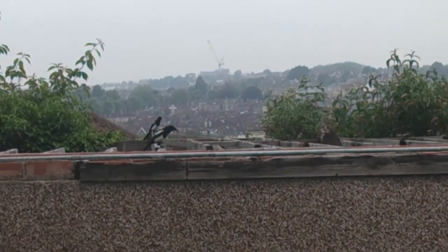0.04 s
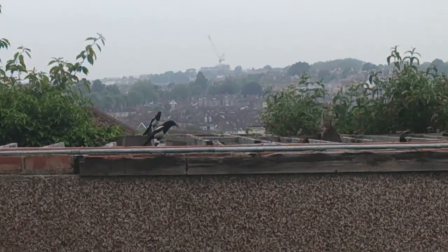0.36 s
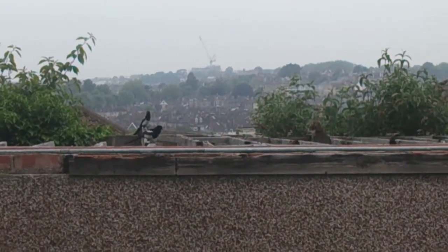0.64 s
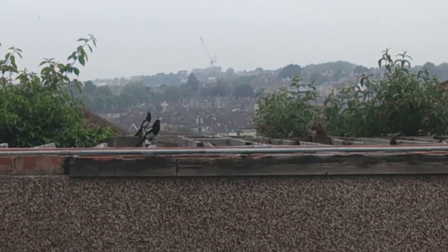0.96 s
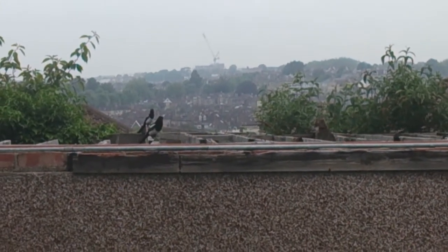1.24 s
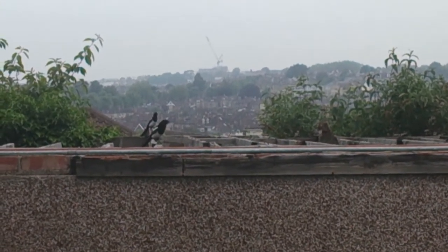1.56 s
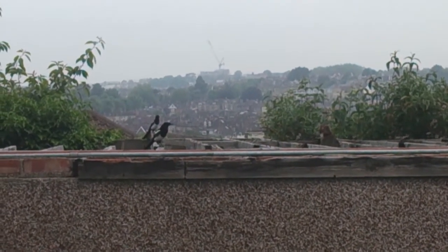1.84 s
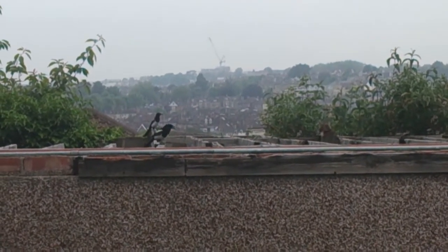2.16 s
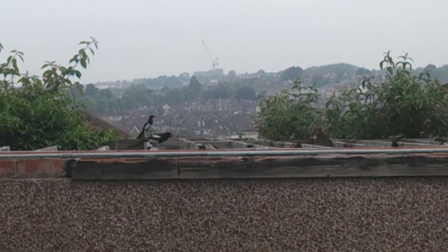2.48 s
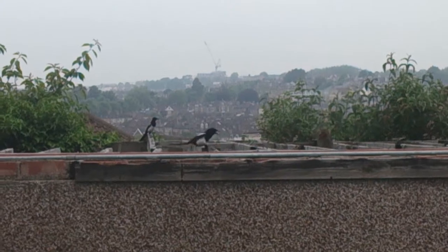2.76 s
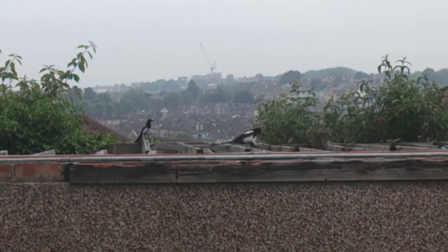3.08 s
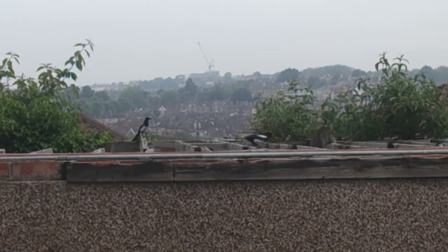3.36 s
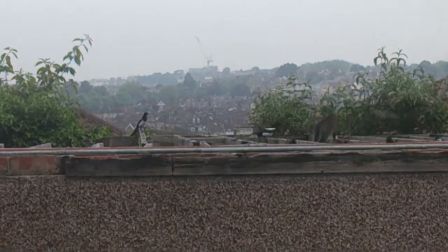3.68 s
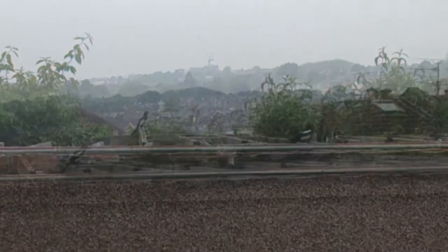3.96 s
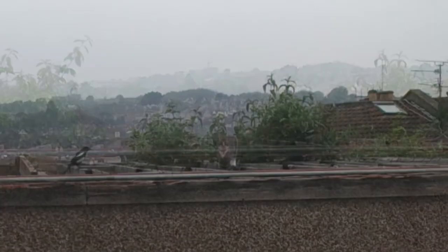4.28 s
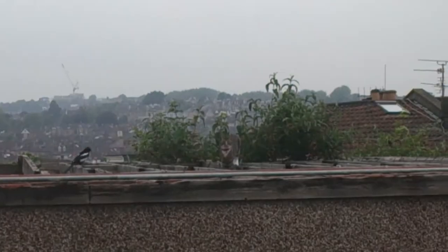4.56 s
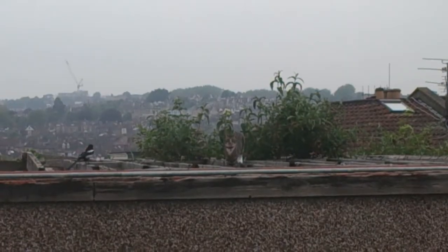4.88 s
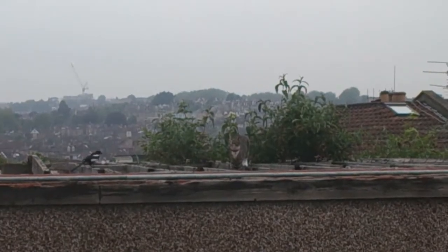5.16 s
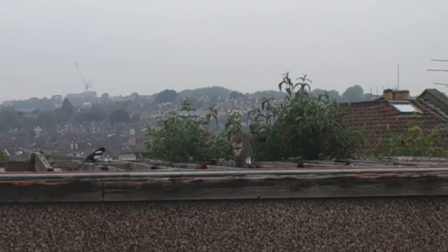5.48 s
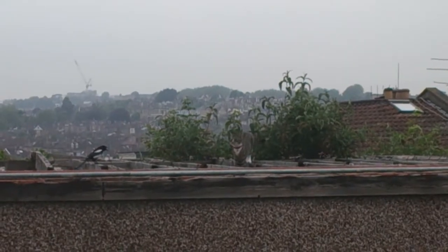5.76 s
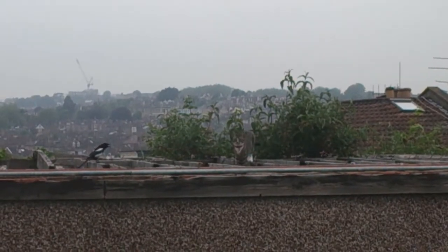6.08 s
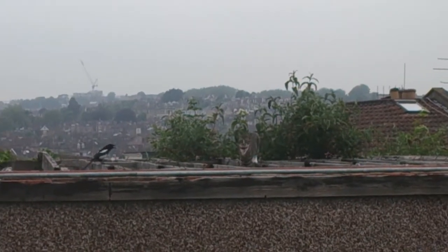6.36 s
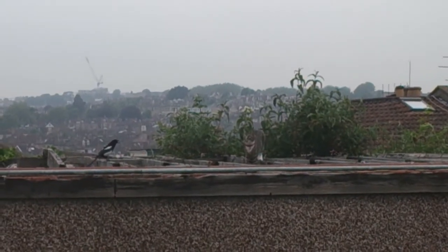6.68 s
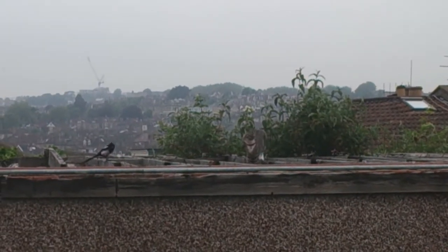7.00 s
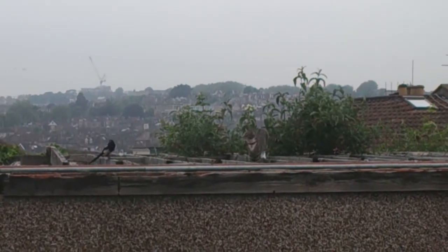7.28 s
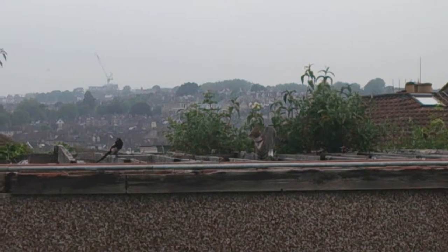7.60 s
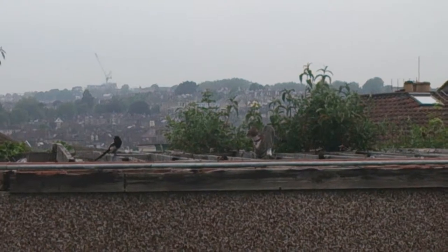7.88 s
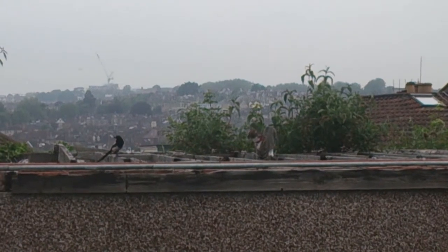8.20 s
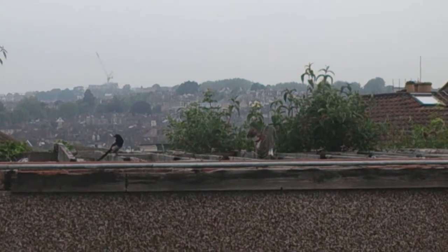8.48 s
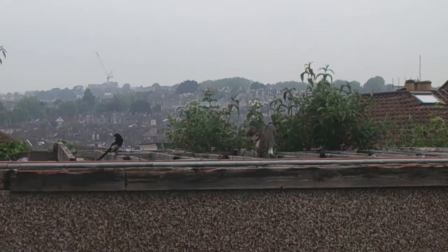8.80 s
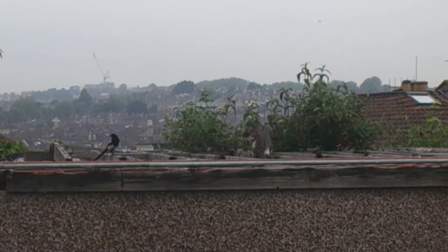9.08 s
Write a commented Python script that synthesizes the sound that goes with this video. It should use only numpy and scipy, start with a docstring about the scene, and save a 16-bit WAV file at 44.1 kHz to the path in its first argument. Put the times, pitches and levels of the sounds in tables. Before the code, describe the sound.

Magpies chatter in harsh, rapid rattling bursts outdoors, over the faint rumble of a town and a distant engine.

```python
"""Magpies scolding a cat

Four bouts of harsh chatter from a flat roof, about nine notes a second: uneven puffs from the syrinx
ring the throat, the open bill adds rasp, and walls and gardens answer. Behind them a town rumbles and
a distant engine drones. Two sharp clicks sound close on the right, a thin electronic whine on the left."""
import sys
import numpy as np
from scipy import signal
from scipy.fft import rfft, irfft, next_fast_len
from scipy.io import wavfile
from scipy.ndimage import uniform_filter1d, map_coordinates

SR = 44100
rng = np.random.default_rng(int(sys.argv[2]) if len(sys.argv) > 2 else 0)


def digitize_waveform(pressure):
    """Quantize a signal to 16-bit integers and store it at the path in sys.argv[1].

    Rows of a 2-D input are taken as channels; values are limited to [-1, 1].
    """
    field = np.atleast_2d(pressure).T
    bounded = np.clip(field, -1, 1)
    quanta = np.round(bounded * 32767).astype(np.int16)
    wavfile.write(sys.argv[1], SR, quanta)


N = 403074


def amp(db):
    """dB to gain."""
    return 10 ** (np.asarray(db) / 20)


def unit(x):
    """Scale to rms 1."""
    return x / np.sqrt(np.mean(x ** 2) + 1e-20)


def along(points, hz):
    """Interpolate (Hz, value) points on a log frequency axis."""
    knots_hz, values = np.transpose(points)
    return np.interp(np.log(hz + 1), np.log(knots_hz), values)


def curves(rows, t=None):
    """Each column after the time, interpolated at times t or at every sample."""
    knots_s, *columns = np.transpose(rows)
    return [np.interp(np.arange(N) / SR if t is None else t, knots_s, column) for column in columns]


def wobble(rate_hz):
    """Smooth random curve, rate_hz knots a second."""
    knots = rng.standard_normal(int(N * rate_hz / SR) + 4)
    return map_coordinates(knots, [np.arange(N) * rate_hz / SR])


def filtered(x, response):
    """Apply a complex frequency response."""
    n = x.shape[-1]
    size = next_fast_len(n + 4096)
    return irfft(rfft(x, size) * response(np.fft.rfftfreq(size, 1 / SR)), size)[..., :n]


def causal(x, gain_db, size=1024):
    """Minimum-phase filter with the response gain_db(hz)."""
    cepstrum = irfft(np.log(amp(gain_db(np.fft.rfftfreq(size, 1 / SR)))))
    cepstrum[1:size // 2] *= 2
    cepstrum[size // 2 + 1:] = 0
    return signal.fftconvolve(x, irfft(np.exp(rfft(cepstrum))))[:len(x)]


def add(track, start_s, sound):
    """Mix a sound into the track."""
    i = round(start_s * SR)
    part = sound[..., max(-i, 0):N - i]
    track[..., max(i, 0):max(i, 0) + part.shape[-1]] += part


def rush(spectrum, correlation, pan_db, patchy_db):
    """Stereo noise, rms near 1, with random gain patches in time and frequency."""
    bins = signal.stft(rng.standard_normal((2, N)), nperseg=512)[2]
    patches = uniform_filter1d(rng.standard_normal(bins.shape[1:]), size=5, axis=0)
    patches = unit(uniform_filter1d(patches, size=20, axis=1))
    pair = signal.istft(bins * amp(patchy_db * patches), nperseg=512)[1][:, :N]
    mid, side = filtered(pair, lambda hz: amp(along(spectrum, hz)))
    side = side * np.tan(np.arccos(correlation) / 2)
    return unit(np.array([mid + side, mid - side])) * amp([[pan_db / 2], [-pan_db / 2]])


def town(surge_db=2.4, drift_db=0.4):
    """Deep rumble, traffic and the wash of far streets, over a faint hiss."""
    # Each row: time in seconds, then rumble, traffic, wash and hiss levels in dB.
    levels = [(0, -58, -63, -64.5, -67), (2.1, -54.5, -63.5, -67, -69.5), (2.6, -59.5, -64.5, -62.5, -66.5),
              (3.5, -54.5, -63.5, -66.5, -67.5), (3.9, -53.5, -57.5, -63, -65),
              (4.45, -52, -60, -63, -64.5), (4.7, -57.5, -62, -64.5, -67.5), (5.7, -56.5, -63.5, -65, -69),
              (6.5, -51.5, -63, -58, -67.5), (7, -57.5, -62.5, -64, -66.5), (7.7, -54.5, -60, -60, -67.5),
              (8.15, -55, -61, -63, -68.5), (9.14, -48.5, -60, -61.5, -68)]
    # Noise spectra. Each row: frequency in Hz, relative density in dB.
    rumble_spectrum = [(12, 1.5), (28, 7.5), (42, 12.5), (55, -3), (80, -1), (130, -45)]
    traffic_spectrum = [(50, -3), (90, 2), (140, -1), (240, -2.5), (400, -10), (700, -13.5), (1500, -52)]
    wash_spectrum = [(200, -0.5), (450, -6), (650, 1.5), (1000, -2.5), (1600, -8.5), (2500, -7.5),
                     (3500, -18.5), (5500, -29), (7500, -42), (12000, -34)]
    hiss_spectrum = [(3000, -5), (5500, -9.5), (7600, -16), (9000, -4.5), (10000, -3.5), (11500, -3),
                     (13000, -12.5), (15000, -10), (15900, -14)]
    rumble_db, traffic_db, wash_db, hiss_db = curves(levels)
    rumble = rush(rumble_spectrum, correlation=0.96, pan_db=4.8, patchy_db=0.3)
    rumble_db += surge_db * wobble(4.4)
    traffic_db += drift_db * wobble(2.96)
    traffic = rush(traffic_spectrum, correlation=0.88, pan_db=3.5, patchy_db=1.5)
    wash = rush(wash_spectrum, correlation=0.46, pan_db=0.8, patchy_db=0.33)
    hiss = rush(hiss_spectrum, correlation=0.036, pan_db=0, patchy_db=1.5)
    return (amp(rumble_db) * rumble + amp(traffic_db) * traffic
            + amp(wash_db) * wash + amp(hiss_db) * hiss)


def engine():
    """A distant exhaust revs and eases off; little but its firing note carries."""
    # Each row: time in seconds, firing rate in Hz, level in dB.
    revs = [(0, 68.2, -70), (1.15, 68, -60), (1.7, 68, -73), (2.1, 68.5, -61.5), (2.7, 68, -71.5),
            (3.7, 69, -59.5), (4.25, 62.4, -61), (4.85, 69.5, -52.5), (5.02, 68.9, -61),
            (5.27, 66.9, -53.5), (5.55, 68, -66), (5.76, 67.7, -52), (6.2, 62, -55.5), (6.55, 66, -56.5),
            (7.1, 60, -60), (8.15, 59.7, -66.5), (8.33, 59.7, -55), (8.8, 64, -48.5), (9.14, 69, -42.5)]
    firing_hz, level_db = curves(revs)
    phase = 2 * np.pi * np.cumsum(firing_hz * (1 + 0.015 * wobble(14))) / SR
    drone = np.sin(phase) + amp(-36) * np.sin(2 * phase) + amp(-29.5) * np.sin(3 * phase)
    return amp(level_db + 2.0 * wobble(6)) * unit(drone) * amp([[1.6], [-1.6]])


def whine(whine_hz=15000, steady_hz=9717, steady_db=-86):
    """An electronic whistle on the left comes on, swells and fades, over a faint steady tone."""
    # Each row: time in seconds, left level in dB.
    levels = [(2.28, -92), (2.33, -66.5), (3.3, -66.5), (4.2, -62.5), (4.7, -66.5), (8.55, -66.5),
              (8.62, -92)]
    tone = lambda hz: np.sqrt(2) * np.sin(2 * np.pi * hz * np.arange(N) / SR)
    whistle = amp(curves(levels)[0]) * tone(whine_hz) * amp([[0], [-15]])
    return whistle + amp(steady_db) * tone(steady_hz)


def clicks(left_db=-19, highpass_hz=450, knock_t60_s=0.0028, rebound_s=0.00191):
    """Hard, dry clicks: a dull knock, a bright snap and one faint rebound."""
    # Each row: start in seconds, knock level in dB, knock frequency in Hz, snap level in dB.
    hits = [(4.1562, -9.5, 1890, -22), (4.465, -7.5, 2180, -0.5)]
    # Each row: frequency in Hz, relative level in dB, T60 in seconds.
    snap_modes = [(3880, -3, 0.0023), (4940, -17.5, .004), (6000, -13, 0.0051), (10600, -12, 0.0027),
                  (11700, 2.5, 0.0017), (13800, -11, 0.0025)]
    out, t = np.zeros(N), np.arange(SR // 40) / SR
    mode = lambda hz, db, t60_s: amp(db - 60 * t / t60_s) * np.sin(2 * np.pi * hz * t)
    attack = 1 - np.exp(-t / 0.00008)
    for start_s, knock_db, knock_hz, snap_db in hits:
        knock = mode(knock_hz, knock_db, knock_t60_s)
        snap = sum(mode(hz, snap_db + db, t60_s) for hz, db, t60_s in snap_modes)
        add(out, start_s, (knock + snap) * attack)
        add(out, start_s + rebound_s, amp(-12) * knock)
    return signal.lfilter(*signal.butter(1, highpass_hz, "high", fs=SR), out) * amp([[left_db], [0]])


def echo(x, t60s, delay_s):
    """Diffuse stereo tail; each frequency decays at its own rate."""
    hz, t, bins = signal.stft(rng.standard_normal((2, SR // 2)), SR, nperseg=256)
    tail = signal.istft(bins * amp(-60 * t / along(t60s, hz)[:, None]), SR, nperseg=256)[1]
    tail = np.pad(tail / np.linalg.norm(tail[0]), ((0, 0), (int(delay_s * SR), 0)))
    return signal.fftconvolve(x[None], tail, axes=1)


def over_roof(call, lead_ms, scatter_s=0.0022, lead_above_hz=1200):
    """The rough roof scatters short waves; unscattered treble arrives left first. Power is kept."""
    # Each row: frequency in Hz, share of power scattered.
    scattered = [(1000, 0.088), (2600, 0.14), (3600, 0.99), (6000, 0.96), (9000, 1), (14000, 0.24)]
    t = np.arange(SR // 100) / SR
    paths = rng.standard_normal((2, len(t))) * np.exp(-t / scatter_s)

    def response(hz):
        share = along(scattered, hz)
        lead_rad = np.pi * np.maximum(hz - lead_above_hz, 0) * lead_ms / 1000 * np.array([[1], [-1]])
        scatter_rad = np.angle(rfft(paths, 2 * len(hz) - 2))
        return np.sqrt(1 - share) * np.exp(1j * lead_rad) + np.sqrt(share) * np.exp(1j * scatter_rad)

    pair = filtered(call, response)
    return pair * np.std(call) / np.std(pair, axis=1, keepdims=True)


def syrinx(t, rate_hz, jitter=0.13, puff_s=0.0018, count=32):
    """Airflow through the membranes: uneven, quickening slaps and their rounded puffs."""
    gaps_s = np.exp(jitter * rng.standard_normal(count)) / rate_hz / (1 + 0.05 * np.arange(count))
    times_s = np.cumsum(gaps_s) - 0.8 / rate_hz
    slaps = np.bincount(np.abs(times_s * SR).astype(int), np.ones(count), len(t))[:len(t)]
    puffs = signal.fftconvolve(slaps, t * np.exp(-t / puff_s))[:len(t)]
    return unit(slaps), unit(puffs)


def swell(t, start_s, length_s, fall_s, rise_s=0.016, crescendo_db=4):
    """Note envelope: rounded rise, growing pressure, quick decay."""
    onset = np.sin(np.pi / 2 * np.clip((t - start_s) / rise_s, 0, 1)) ** 2
    pressure = amp(crescendo_db * np.clip((t - start_s) / length_s, 0, 1))
    return onset * pressure * np.exp(-np.maximum(t - start_s - length_s, 0) / fall_s)


def note(length_s, level_db, throat_hz, hiss_db, rasp_db=-9.5, ring_db=3.5, ring_width_hz=150):
    """One 'chak': the throat sounds first, the treble follows as the bill opens."""
    # Voice bands, low to high. Each row: frequency in Hz, relative gain in dB.
    body_band = [(300, -26.5), (700, -19.5), (1100, -7.5), (1400, 0.5), (1650, 2), (1900, 9.5),
                 (2200, -14.5), (3000, -38.5)]
    throat_band = [(1200, -30.5), (1800, -13), (2000, -2), (2180, -2.5), (2400, 3.5), (2750, -1),
                   (3050, -8.5), (3500, -21), (4500, -42.5)]
    rasp_band = [(2500, -28), (3300, -6), (3900, -5), (4500, -3), (4950, 3), (5600, -3.5), (6200, -5.5),
                 (7300, -13), (9000, -32)]
    hiss_band = [(6000, -26), (8200, -5.5), (9500, -1.5), (11500, 1.5), (12900, -3), (13800, -3),
                 (15000, -10), (16000, -32)]
    t = np.arange(SR // 8) / SR
    slaps, puffs = syrinx(t, rate_hz=152.1 * throat_hz / 2498)  # a tighter throat pulses faster
    pulses = 0.33 * slaps + puffs * rng.standard_normal(len(t))
    air = 0.5 * pulses + 0.94 * rng.standard_normal(len(t))
    effort = swell(t, 0, length_s - 0.001, fall_s=0.0094)
    bill_air = air * swell(t, 0.0068, length_s - 0.008, fall_s=0.023)
    # Each puff carries a few cycles of the membranes' unsteady whistle.
    waver = unit(uniform_filter1d(rng.standard_normal(len(t)), size=90))
    phase = 2 * np.pi * np.cumsum(throat_hz * (1 + 0.061 * waver)) / SR
    whistle = unit(puffs * effort * np.sin(phase))
    # Soft notes are hoarser: less whistle, more body.
    whistle_db = -5 + 0.1 * (level_db + 40)
    body_db = -8 - 0.16 * (level_db + 43)
    resonance = lambda hz: ring_db / (1 + ((hz - throat_hz) / ring_width_hz) ** 2)
    warp = (2500 / throat_hz) ** 0.17
    bands = [(pulses * effort, lambda hz: along(throat_band, hz * warp) + resonance(hz), -1.8),
             (pulses * effort, lambda hz: along(body_band, hz), body_db),
             (bill_air, lambda hz: along(rasp_band, hz), rasp_db),
             (bill_air, lambda hz: along(hiss_band, hz), hiss_db)]
    voice = amp(whistle_db) * whistle + sum(amp(db) * unit(causal(x, shape)) for x, shape, db in bands)
    return amp(level_db) * voice * np.sqrt(length_s / t[-1])


def magpies(garden_db=-16.5, wall_turn=0.33, bout_gap_s=0.3, hush_s=(4.58, 5.55)):
    """Notes arrive over the roof and off walls and gardens; a turned head dulls only the direct path."""
    # Each row: time in seconds, level in dB.
    notes = [(-.025, -45.5), (.079, -46.5), (.182, -46.5), (.29, -47.5), (.399, -47), (.878, -48),
             (.95, -40), (1.027, -40), (1.11, -40), (1.19, -40), (1.278, -39), (1.377, -38.5),
             (1.499, -39.5), (2.347, -45.5), (2.417, -42), (2.494, -42), (2.582, -40.5), (2.669, -38.5),
             (2.772, -41), (2.88, -41), (2.989, -43), (3.092, -42), (3.215, -42.5), (3.324, -44),
             (3.433, -44), (3.534, -44.5), (3.64, -44), (3.745, -42.5), (3.844, -41.5), (3.957, -42),
             (4.069, -42.5), (4.174, -41.5), (4.29, -43), (4.398, -42), (4.503, -43), (5.6, -55.5),
             (5.67, -49), (5.744, -46.5), (5.827, -47.5), (5.911, -47), (6.002, -46), (6.106, -44.5),
             (6.212, -42), (6.322, -42), (6.431, -42), (6.565, -44), (6.699, -42.5), (6.805, -42),
             (6.913, -40.5), (7.016, -42), (7.119, -41), (7.221, -43), (7.328, -41), (7.433, -43),
             (7.542, -42.5), (7.655, -42.5), (7.792, -43.5)]
    # Each row: time in seconds, throat resonance in Hz, head turned away from 0 to 1.
    caller = [(0, 2760, 0.04), (.4, 2686, 0.16), (.9, 2478, 0.23), (1.5, 2478, 0.21), (2.38, 2527, 0.67),
              (2.64, 2595, 0.24), (2.9, 2527, 0.85), (3.8, 2543, 1), (4.45, 2428, 1), (5.6, 3033, 0.3),
              (6.03, 2933, 0.36), (6.28, 2683, .3), (6.5, 2430, 0.66), (6.72, 2573, 0.29),
              (7.05, 2477, 0.01), (7.8, 2550, 0.01)]
    # Each row: time in seconds, left lead in ms, wall echo in dB, hiss in dB re note level.
    place = [(0, 0.071, -6, -8.5), (1.5, 0.076, -9.5, -12.5), (2.6, 0.043, -9, -11.5),
             (4.4, 0.023, -2, -16), (5.7, 0.28, -2.5, -18), (6.4, .26, -7, -14), (7.8, 0.19, -5, -14)]
    # The bill beams treble forward. Each row: frequency in Hz, gain in dB when fully turned away.
    beam = [(2800, -0.5), (5000, -17), (10000, -19.5)]
    # Echo decay. Each row: frequency in Hz, T60 in seconds.
    wall_t60s = [(500, 0.63), (2500, 0.23), (5000, 0.48), (12000, 0.045)]
    garden_t60s = [(500, 0.84), (1700, 0.94), (2250, 0.88), (2580, 1), (2900, 0.88), (3500, 0.5),
                   (4400, .5), (5050, 0.85), (5800, 0.65), (9000, 0.097)]
    # Each row: frequency in Hz, left minus right in dB.
    pan = [(700, 1.5), (1300, -4), (2400, 0), (3200, 7), (4500, 5.5), (6300, 6), (8100, -3), (11000, -4.5),
           (15000, 5)]
    first_length_s, late_length_s = 0.035, 0.05  # notes lengthen through a bout
    out, sung, previous_s = np.zeros((2, N)), 0, -np.inf
    for time_s, level_db in notes:
        sung = sung + 1 if time_s - previous_s < bout_gap_s else 0
        previous_s = time_s
        length_s = late_length_s + (first_length_s - late_length_s) * np.exp(-sung / 7)
        throat_hz, turn = curves(caller, time_s)
        lead_ms, wall_db, hiss_db = curves(place, time_s)
        call = note(length_s, level_db, throat_hz, hiss_db)
        call /= np.hypot(1, 0.87 * amp(wall_db))  # offsets the power the walls add
        direct = causal(call, lambda hz: turn * along(beam, hz))
        sideways = causal(call, lambda hz: wall_turn * along(beam, hz))
        start_s = time_s - 0.0096
        add(out, start_s, over_roof(direct, lead_ms))
        add(out, start_s, amp(wall_db) * echo(sideways, wall_t60s, delay_s=0.004))
        add(out, start_s, amp(garden_db) * echo(sideways, garden_t60s, delay_s=0.035))
    # Chatter and echo drop out abruptly between the hush_s times.
    t = np.arange(N) / SR
    gate = uniform_filter1d(1.0 * ((t < hush_s[0]) | (t > hush_s[1])), size=128)
    return gate * filtered(out, lambda hz: amp(along(pan, hz) * np.array([[0.5], [-0.5]])))


def scene():
    """Birds and clicks in front of the town."""
    return town() + engine() + whine() + clicks() + magpies()


def record(dry, cutoff_hz=16200):
    """Steep low-pass band limit."""
    return filtered(dry, lambda hz: 1 / np.sqrt(1 + (hz / cutoff_hz) ** 160))


dry = scene()
out = record(dry)
digitize_waveform(out)
```